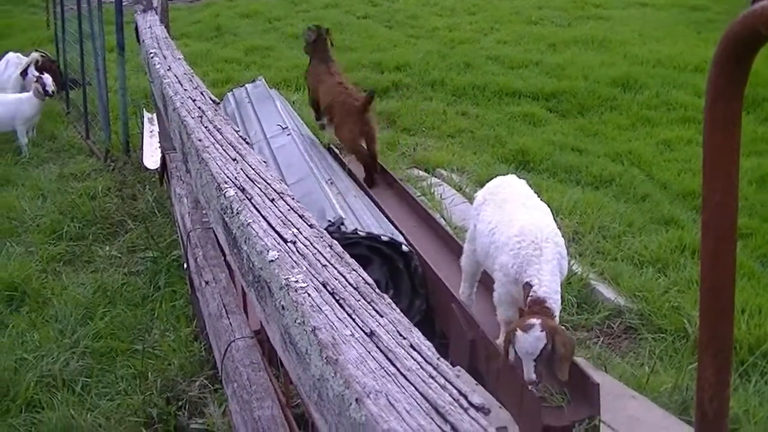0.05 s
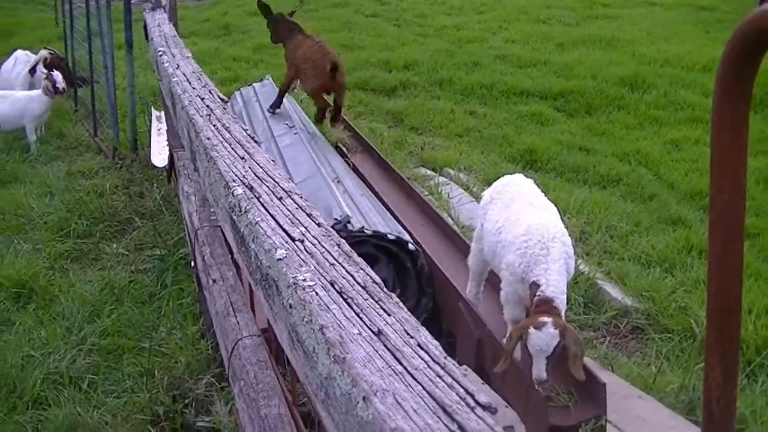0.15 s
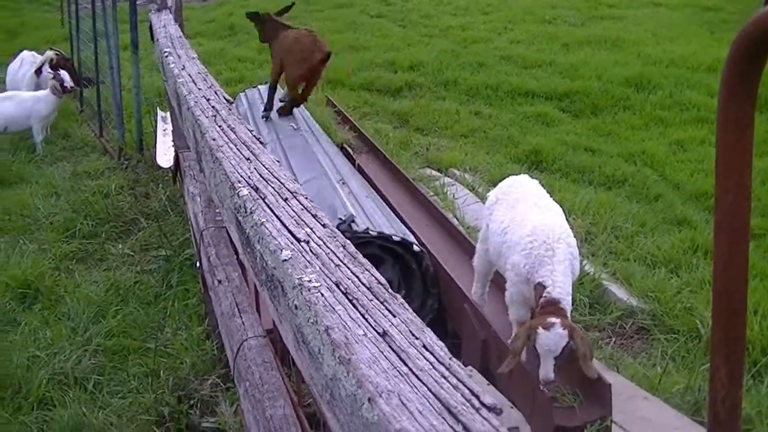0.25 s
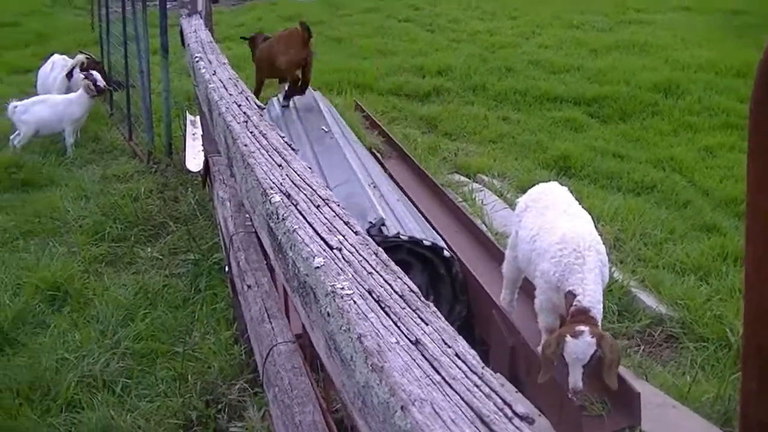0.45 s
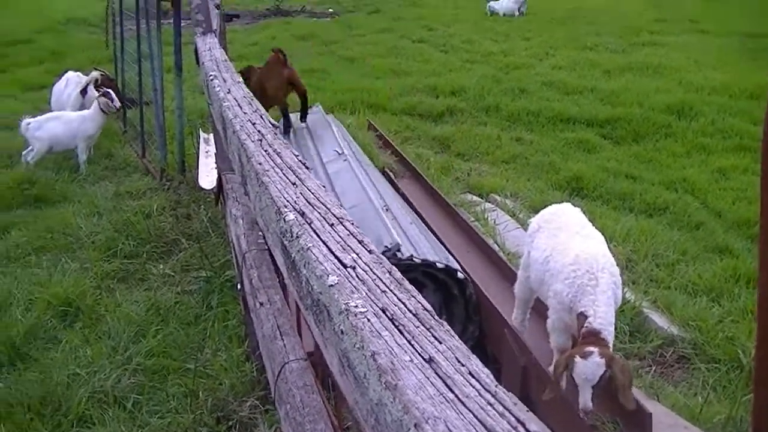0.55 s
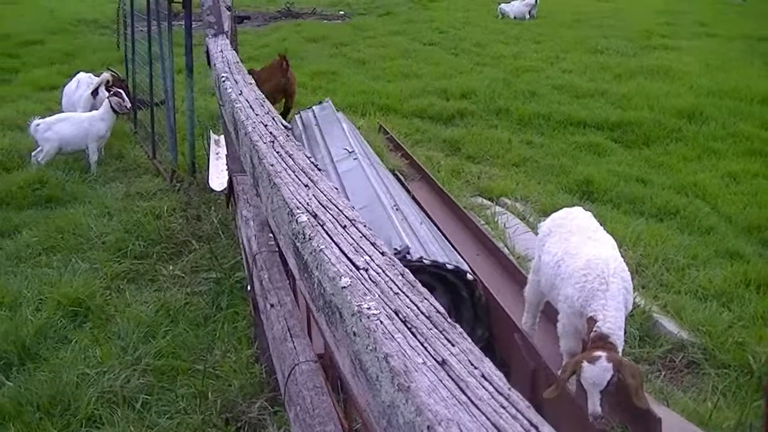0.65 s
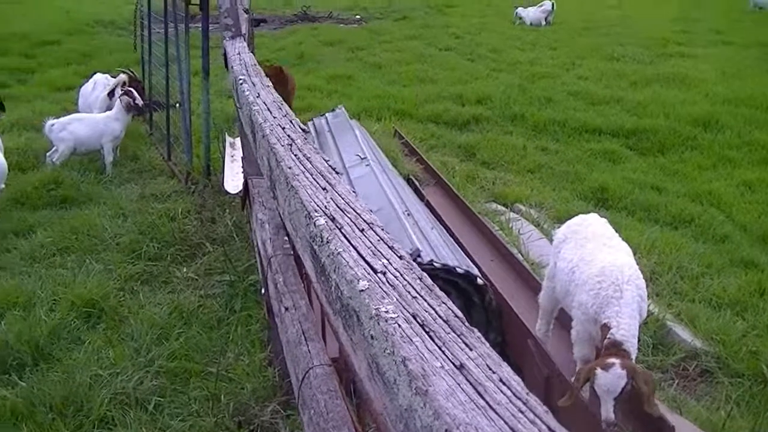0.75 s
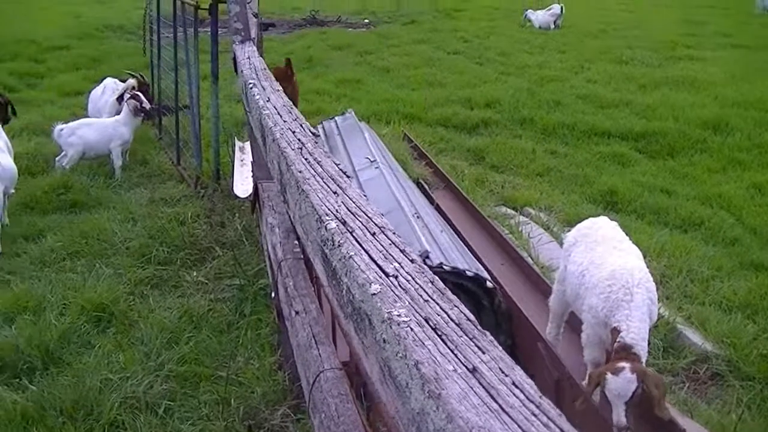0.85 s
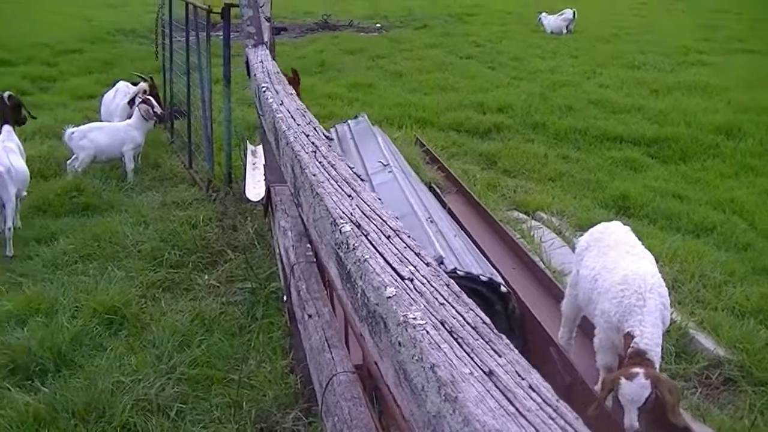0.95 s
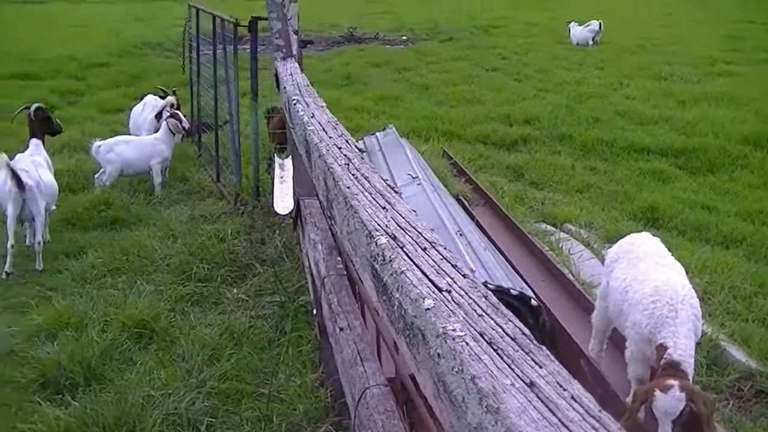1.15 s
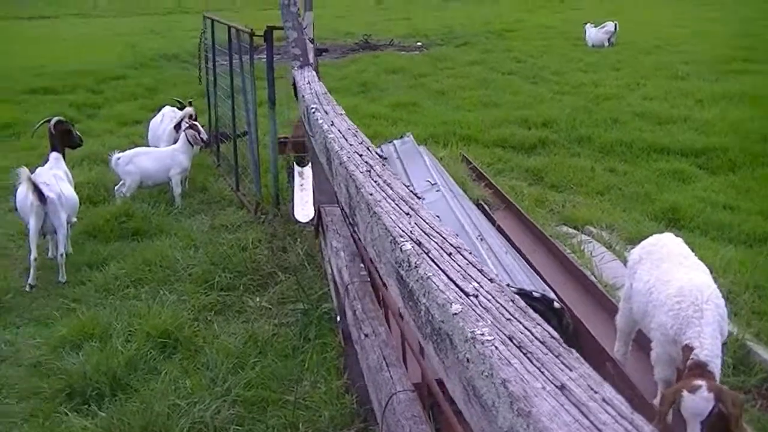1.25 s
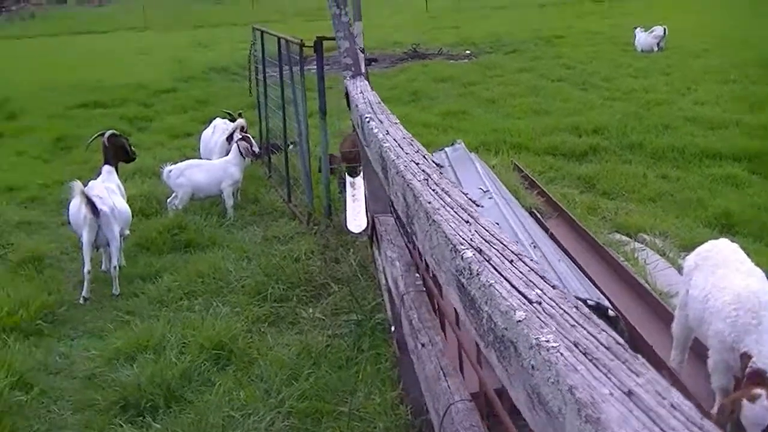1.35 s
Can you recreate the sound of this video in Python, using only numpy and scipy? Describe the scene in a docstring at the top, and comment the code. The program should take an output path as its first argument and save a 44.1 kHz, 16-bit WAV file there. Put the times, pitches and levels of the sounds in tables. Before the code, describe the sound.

Small hooves knock and rattle over sheet metal as a young goat runs across it outdoors.

```python
"""First come far-off birds, trilling in falling notes over a thin insect chorus and a light breeze.
Almost at once a young goat runs over a loose sheet of corrugated metal in the paddock and jumps off.
Each hoof gives a short knock and sets the sheet's many tones ringing, with a bright scuff on top.
The sheet rattles against its support and settles."""
import sys
import numpy as np
from scipy import signal
from scipy.fft import rfft, irfft, next_fast_len
from scipy.io import wavfile
from scipy.ndimage import uniform_filter1d, map_coordinates

SR = 44100
rng = np.random.default_rng(int(sys.argv[2]) if len(sys.argv) > 2 else 0)


def transcribe(signal):
    """Save signal, clipped to [-1, 1], as a 16-bit WAV file at the path in sys.argv[1]."""
    frames = np.atleast_2d(signal).T
    limited = np.clip(frames, -1, 1)
    pcm = np.round(limited * 32767).astype(np.int16)
    wavfile.write(sys.argv[1], SR, pcm)


N = 61739

# Table levels are relative. A "colour" says how strong a noise is from low to high pitch.
# A fade time (T60) is how long a sound takes to drop by 60 dB.
# colours of the breeze's middle and sides, the insects and the grass (frequency [Hz], level [dB])
BREEZE_COLOUR = [(24, -75), (40, -39), (253, -11), (359, -9), (653, -6), (778, -6.5), (859, -7.5),
                 (1050, -12.5), (1730, -13), (3060, -14), (3650, -8), (3930, -4.5), (4350, -22.5),
                 (11500, -30), (15500, -41)]
BREEZE_SIDE_COLOUR = [(24, -59), (40, -37), (284, -16), (422, -7.5), (502, -13), (1060, -10), (2780, -10.5),
                      (3650, -5.5), (4450, -18), (7490, -21.5), (15000, -63)]
INSECT_COLOUR = [(2800, -25), (3400, -29), (3700, -0.5), (3850, -2.5), (4000, -13), (4250, -37),
                 (5000, -44)]
GRASS_COLOUR = [(3000, -15), (7000, -3), (10000, 4), (15000, -17)]
# how the breeze and the insects swell and sink (time [s], level [dB])
BREEZE_SWELL = [(0, 3.5), (.15, 0), (.3, 6.5), (1.0, 1.5), (1.4, 0.5)]
INSECT_SWELL = [(0, -54), (.2, -62), (.47, -53), (.9, -58.5), (1.1, -66.5), (1.21, -57), (1.4, -62)]
# rustles in the grass (time [s], length [s], level [dB])
RUSTLES = [(0.034, .06, -72.5), (1.295, 0.056, -68.5)]
# calls of the farthest birds (time [s], length [s], start pitch [Hz], end pitch [Hz], level [dB])
WHISTLES = [(1.166, 0.053, 3500, 3220, -56.5), (1.192, 0.13, 2340, 2080, -66),
            (1.305, .045, 3460, 3230, -55)]
# runs of bird notes (start [s], end [s], note spacing [s], note length [s], level [dB])
TRILLS = [(-0.002, 0.07, .044, .025, -1), (0.104, 0.17, .033, .022, -7), (0.292, 0.63, .062, .031, 0),
          (0.712, 1.01, .0347, .022, 0), (1.201, 1.36, .0355, .024, -3)]
# hoof edges skidding on the metal (time [s], level [dB])
SKIDS = [(0.333, -41.5), (0.641, -41), (0.658, -44)]
# hard hoof walls tapping the metal (time [s], level [dB], pitch [Hz])
CLICKS = [(0.230, -30, 2840), (0.334, -30, 3300), (0.498, -28.5, 3010), (0.585, -23.5, 3200),
          (0.749, -32, 3070), (0.899, -34, 3020), (0.958, -37, 2850)]
# colours of a skid, the echo and the ringing sheet (frequency [Hz], level [dB])
SKID_COLOUR = [(4000, -19), (7000, -10), (8250, 2), (8900, -4), (10500, -9.5), (15000, -27)]
ECHO_COLOUR = [(100, -4), (700, -19), (1200, 4), (2200, 12), (5000, 8), (8500, 19.5), (10500, -17)]
SHEET_COLOUR = [(41, -71), (70, -37.5), (193, -20), (399, -14.5), (613, 1), (686, -2), (984, -3),
                (1080, -2), (1180, -6.5), (1550, -11.5), (1690, -8.5), (2220, -11.5), (2980, -15.5),
                (3730, -20.5), (5360, -33.5), (6870, -35.5), (8050, -35), (11800, -37.5), (15500, -44)]
# the sheet's five bands of crowded tones, low to high: boom, clank, clang, ting, scuff
# (low edge [Hz], high edge [Hz], level [dB], rise [s], fade [times the blow's ring fade], tail [dB])
SHEET_BANDS = [(370, 839, -5, 0.0018, 1.02, -16.5), (757, 1430, -4.5, 0.0021, 1.18, -21),
               (1310, 2175, -3, 0.0025, 1.003, -24), (2470, 5100, -5.5, 0.00081, 1.03, -27),
               (4760, 12500, -4.5, 0.0014, 1.13, -26)]
# the sheet's strongest single tones (pitch [Hz], level [dB], fade time [s])
SHEET_TONES = [(472, -5, 0.28), (553.7, -8.5, 0.54), (635.4, -2, 0.35), (710, -4.5, .3), (831, 0.5, 0.13),
               (860, 3, 0.14), (971, -6, 0.34), (1170, -12, 0.75), (1366, -4, 0.34), (1508, -8, 0.19),
               (1643, -21, .33), (1867, -12, .3), (2073, -20, 0.46), (2550, -16, 0.37), (2825, -11, 0.2)]
# blows on the sheet (time [s], knock level [dB], knock pitch [Hz], knock fade [s],
# boom [dB], clank [dB], clang [dB], ting [dB], scuff [dB], ring fade [s])
BLOWS = [ (0.094, -46.5, 509, 0.25, -48, -51, -43, -75, -62, 0.051),
         (0.231, -25.5, 961, 0.12, -48.5, -37, -44.5, -43.5, -49.5, 0.32),
         (0.335, -9.5, 1015, 0.02, -35, -29, -34.5, -36, -40, 0.1),
         (0.349, -27.5, 599, 0.15, -42.5, -36, -36, -43, -48.5, 0.18),
         (0.371, -23.5, 934, 0.062, -41.5, -34, -41, -37, -73, 0.094),
         (0.464, -47, 870, 0.034, -44.5, -56, -47, -47, -75, .12),
         (0.492, -15, 641, 0.095, -27.5, -25, -29.5, -34.5, -44.5, 0.2),
         (0.508, -6.5, 990, 0.022, -27, -42, -29.5, -40.5, -51, 0.089),
         (0.532, -40, 815, 0.024, -46, -42, -46, -42.5, -49, 0.24),
         (0.577, -43, 800, 0.024, -46, -31, -43, -61, -44.5, 0.11),
         (0.585, -13, 946, .05, -24, -30.5, -32.5, -30, -47.5, 0.2),
         (0.603, -18, 834, 0.095, -36, -28.5, -38, -61, -77, 0.2),
         (0.643, -13.5, 1004, 0.038, -33.5, -30.5, -31, -31, -41, 0.21),
         (0.659, -25.5, 616, 0.035, -35.5, -36, -54, -52, -66, 0.25),
         (0.692, -31, 864, 0.014, -39, -57, -45, -40, -64, 0.15),
         (0.745, -31, 720, .04, -43, -47.5, -41, -43, -58, .1),
         (0.752, -19.5, 1090, 0.02, -47, -33.5, -38, -47.5, -59.5, .12),
         (0.843, -18, 659, 0.039, -38.5, -30, -36, -38.5, -53.5, 0.16),
         (0.899, -21, 1080, 0.023, -45, -36, -37.5, -42, -54.5, 0.11),
         (0.949, -28.5, 846, 0.026, -44, -41, -39.5, -41.5, -60, 0.076),
         (0.961, -49, 706, 0.047, -46.5, -48.5, -45, -45, -66, 0.2),
         (1.063, -35, 897, 0.043, -62, -52, -47.5, -59, -77, 0.13),
         (1.092, -30, 997, 0.03, -45.5, -42.5, -41.5, -57, -84, 0.084),
         (1.104, -26.5, 670, 0.032, -45, -51.5, -56, -67, -75, 0.084),
         (1.133, -36, 650, 0.023, -58, -50.5, -60, -62, -77, 0.08),
         (1.176, -37.5, 630, 0.032, -72, -50, -54.5, -60, -80, 0.056)]

BREEZE_DB, BREEZE_SIDE_DB, INSECT_SIDE_DB = -60, -16.5, -12.5
TRILL_DB, BIRD_PAN_DB = -50, 0.85
NOTE_START_HZ, NOTE_FALL_HZ, NOTE_BEND = 3817, 580, 2.91
WAVER_HZ, WAVER_PER_S = 34.8, 170  # unsteady bird pitch
KNOCK_DB, KNOCK_RISE_S = -7, 0.00077
TONE_DB, TAIL_T60_S, ECHO_DB = -11.5, 0.89, -33
RATTLE_DB, RATTLE_PER_S = 1.5, 170
FLEX_DB, FLEX_RISE_S, FLEX_T60_S, FLEX_TOP_HZ = -21.5, 0.0061, 0.38, 370  # slow bending of the sheet
LOW_CUT_HZ, TOP_HZ = 100, 15750


def amp(db):
    """Turn decibels into a number to multiply by."""
    return 10 ** (np.asarray(db) / 20)


def filtered(x, response):
    """Scale each frequency in x by response(frequency)."""
    size = next_fast_len(N + 8192)
    return irfft(rfft(x, size) * response(np.fft.rfftfreq(size, 1 / SR)), size)[..., :N]


def noise(colour, lo_hz=1, hi_hz=SR):
    """Noise of a given colour between two steep edges, with an average power of 1."""
    def response(hz):
        points_hz, points_db = np.transpose(colour)
        db = np.interp(np.log(hz + 1), np.log(points_hz + 1), points_db)
        return amp(db) / np.sqrt((1 + (lo_hz / (hz + 1)) ** 16) * (1 + (hz / hi_hz) ** 16))
    hiss = filtered(rng.standard_normal(N), response)
    return hiss / np.sqrt(np.mean(hiss ** 2) + 1e-20)


def steady(x):
    """Take the slow swells out of a noise."""
    return x / np.sqrt(np.abs(uniform_filter1d(x * x, 700)) + 1e-9)


def since(start):
    """Seconds since start, zero before it."""
    return np.maximum(np.arange(N) / SR - start, 0)


def strike(t, rise_s, t60):
    """The loudness of a hit: a quick rise, then a fade."""
    return (1 - np.exp(-t / rise_s)) * amp(-60 * t / t60)


def swell(points):
    """A loudness curve through (time [s], level [dB]) points."""
    return amp(np.interp(np.arange(N) / SR, *np.transpose(points)))


def wobble(per_s):
    """A smooth curve through per_s random values a second."""
    return map_coordinates(rng.standard_normal(2000), [np.arange(N) * per_s / SR], mode="wrap")


def widen(middle, side):
    """Make left and right channels; more side sounds wider."""
    return np.array([middle + side, middle - side])


def breeze():
    """Moving air makes a soft hush that swells and sinks."""
    hush = widen(noise(BREEZE_COLOUR), amp(BREEZE_SIDE_DB) * noise(BREEZE_SIDE_COLOUR))
    return amp(BREEZE_DB) * swell(BREEZE_SWELL) * hush


def insects():
    """Many insects blend into one narrow, flickering band of high noise."""
    return swell(INSECT_SWELL) * widen(noise(INSECT_COLOUR), amp(INSECT_SIDE_DB) * noise(INSECT_COLOUR))


def grass():
    """Grass rustles in faint, short puffs of hiss."""
    return sum(amp(db) * np.sin(np.pi * np.clip(since(start) / length, 0, 1)) * noise(GRASS_COLOUR)
               for start, length, db in RUSTLES)


def bird_whistles():
    """The farthest birds give faint whistles that slide down."""
    out = np.zeros(N)
    for start, length, start_hz, end_hz, db in WHISTLES:
        progress = np.clip(since(start) / length, 0, 1)
        hz = start_hz + (end_hz - start_hz) * progress + WAVER_HZ * wobble(WAVER_PER_S)
        out += amp(db) * np.sin(np.pi * progress) * np.sin(2 * np.pi * np.cumsum(hz) / SR)
    return out


def bird_trills():
    """A bird sings runs of short notes, each holding its pitch and then hooking down."""
    out = np.zeros(N)
    for first, end, spacing, length, db in TRILLS:
        for start in np.arange(first, end, spacing):
            progress = np.clip(since(start) / length, 0, 1)
            hz = NOTE_START_HZ - NOTE_FALL_HZ * progress ** NOTE_BEND + WAVER_HZ * wobble(WAVER_PER_S)
            loudness = 2 * amp(TRILL_DB + db + rng.normal(0, 1)) * np.sin(np.pi * progress ** 1.5)
            out += loudness * np.sin(2 * np.pi * np.cumsum(hz) / SR)
    return out


def fence_echo(metal):
    """The fence and trough throw back a faint, short, bright echo of the metal."""
    echo = noise(ECHO_COLOUR) * strike(since(0), rise_s=0.0017, t60=0.031)
    return amp(ECHO_DB) * signal.fftconvolve(metal, echo / np.linalg.norm(echo))[:N]


def hoof_skids():
    """A hoof edge scrapes briefly and the metal zings."""
    return sum(2 * amp(db) * strike(since(start), rise_s=0.0018, t60=0.045) * noise(SKID_COLOUR)
               for start, db in SKIDS)


def hoof_clicks():
    """The hard hoof wall taps out three brief high tones, the outer two half as strong."""
    out = np.zeros(N)
    for start, db, hz in CLICKS:
        t = since(start)
        tones = sum(gain * np.sin(2 * np.pi * (hz * ratio * t + rng.random()))
                    for ratio, gain in ((0.925, 0.5), (1, 1), (1.075, 0.5)))
        out += amp(db) * strike(t, rise_s=0.0013, t60=0.017) * tones
    return out


def metal_sheet():
    """Each blow knocks on the sheet, sets its tones ringing and bends the whole of it."""
    out = np.zeros(N)
    rattle = amp(RATTLE_DB * wobble(RATTLE_PER_S))  # the loose sheet buzzes against its support
    boom_top_hz = SHEET_BANDS[0][1]
    for start, knock_db, knock_hz, knock_t60, *band_levels, ring_t60 in BLOWS:
        t = since(start)
        boom_db, clank_db = band_levels[:2]
        knock = strike(t, KNOCK_RISE_S, knock_t60) * np.sin(2 * np.pi * knock_hz * t)
        out += amp(knock_db + KNOCK_DB) * knock
        # Tones packed this closely sound like bands of noise.
        for db, (lo_hz, hi_hz, band_db, rise_s, stretch, tail_db) in zip(band_levels, SHEET_BANDS):
            fade = strike(t, rise_s, ring_t60 * stretch) + amp(tail_db) * strike(t, rise_s, TAIL_T60_S)
            out += amp(db + band_db) * fade * rattle * steady(noise(SHEET_COLOUR, lo_hz, hi_hz))
        # The strongest tones stand out, a little differently on each blow.
        for hz, db, t60 in SHEET_TONES:
            chance_db, phase = rng.normal(0, 2), rng.normal()
            blow_db = boom_db if hz < boom_top_hz else clank_db
            tone = strike(t, KNOCK_RISE_S, t60) * np.sin(2 * np.pi * (hz * t + phase))
            out += amp(blow_db + TONE_DB + db + chance_db) * tone
        flex = strike(t, FLEX_RISE_S, FLEX_T60_S) * noise(SHEET_COLOUR, hi_hz=FLEX_TOP_HZ)
        out += amp((boom_db + clank_db) / 2 + FLEX_DB) * flex
    return out


def scene():
    """The sheet lies straight ahead, the birds a little to the left, the paddock all around."""
    metal = metal_sheet() + hoof_clicks() + hoof_skids()
    wide_metal = widen(metal, fence_echo(metal))
    birds = (bird_trills() + bird_whistles()) * amp([[BIRD_PAN_DB], [-BIRD_PAN_DB]])
    return wide_metal + birds + insects() + breeze() + grass()


def record(dry):
    """Cut the deep bass and the very highest treble."""
    low_cut = signal.butter(3, LOW_CUT_HZ, "highpass", fs=SR, output="sos")
    return filtered(signal.sosfilt(low_cut, dry), lambda hz: hz < TOP_HZ)


dry = scene()
out = record(dry)
transcribe(out)
```